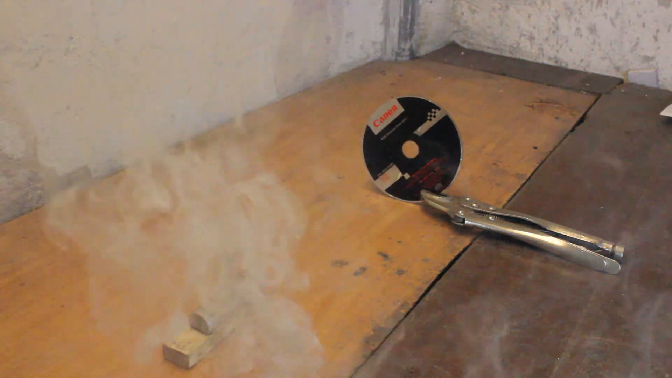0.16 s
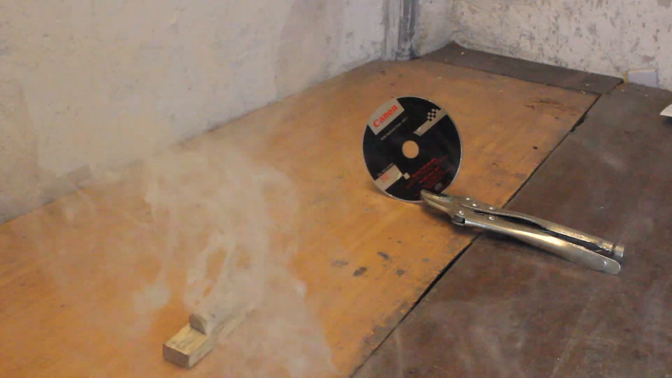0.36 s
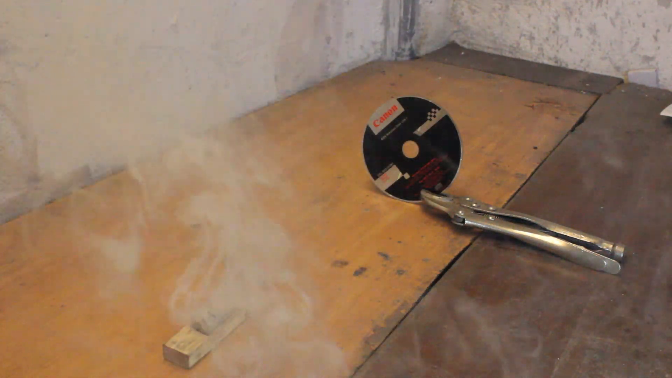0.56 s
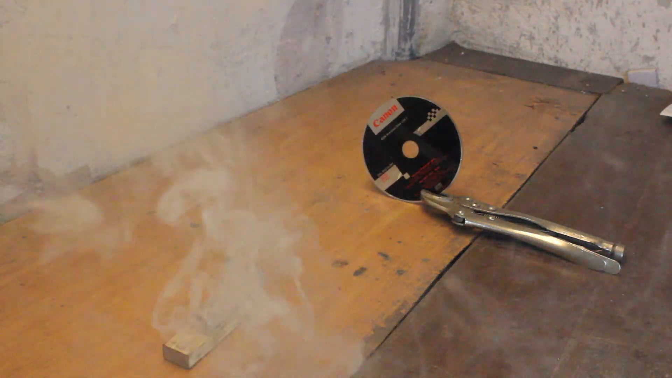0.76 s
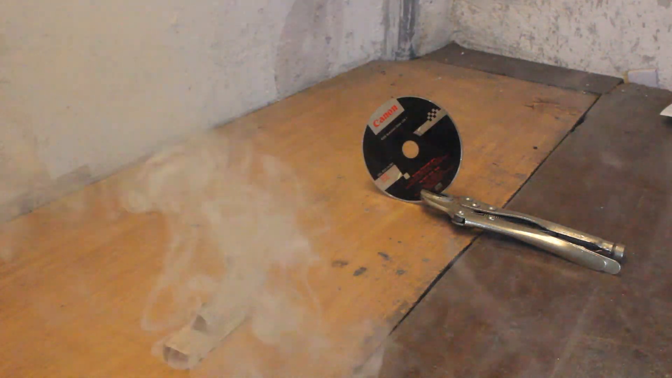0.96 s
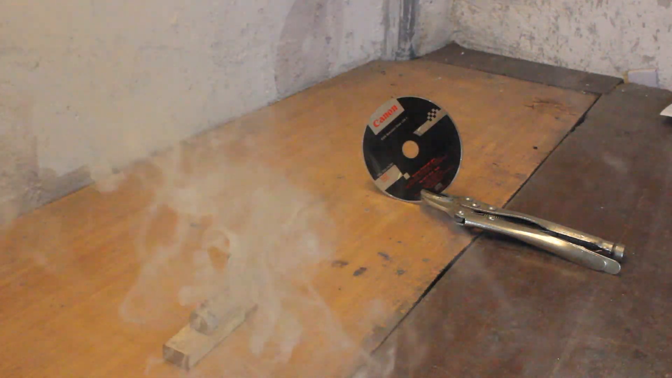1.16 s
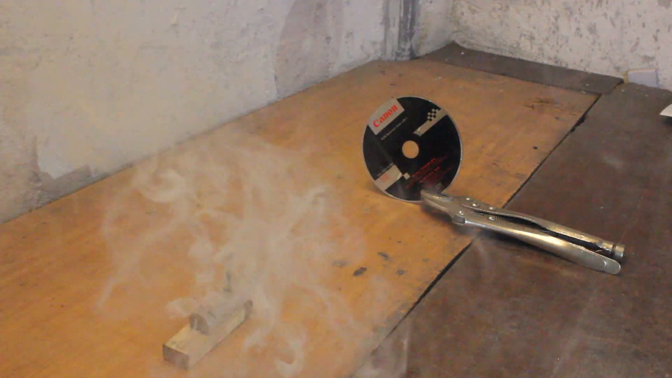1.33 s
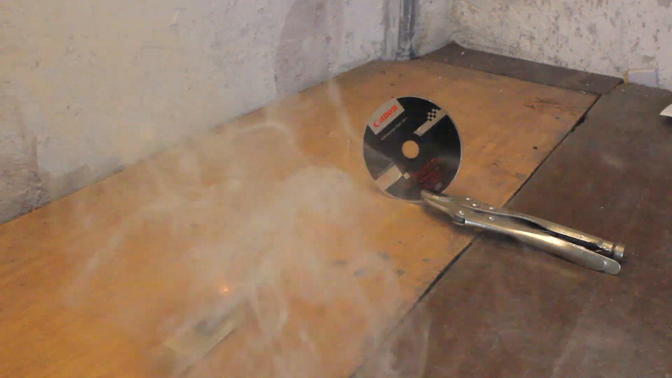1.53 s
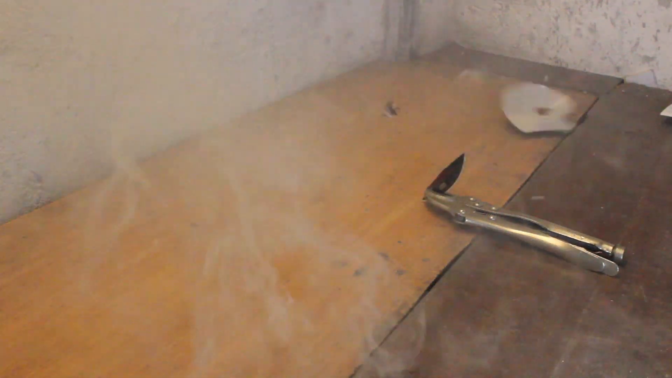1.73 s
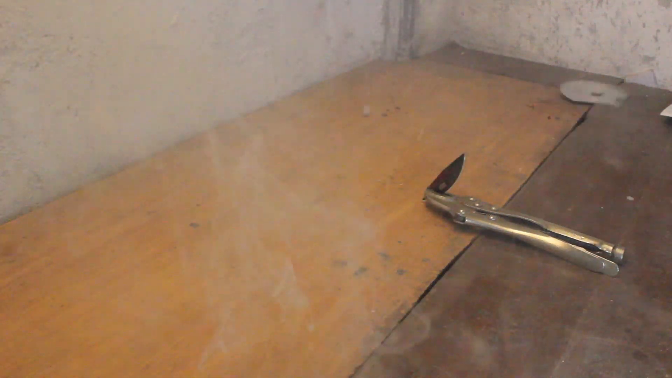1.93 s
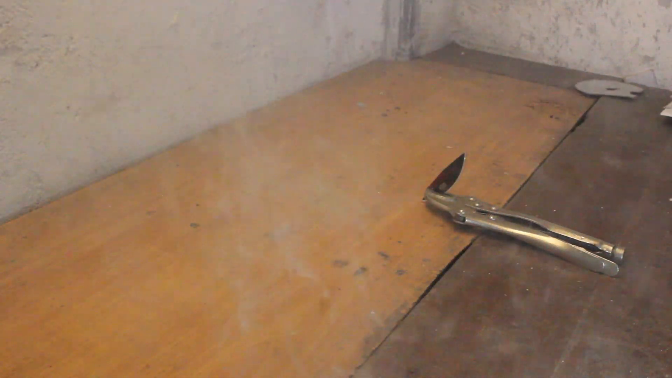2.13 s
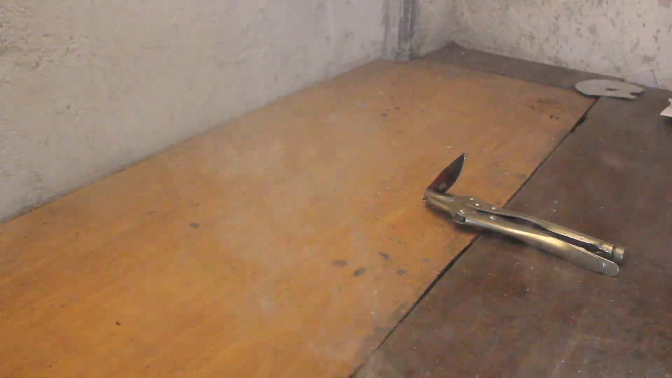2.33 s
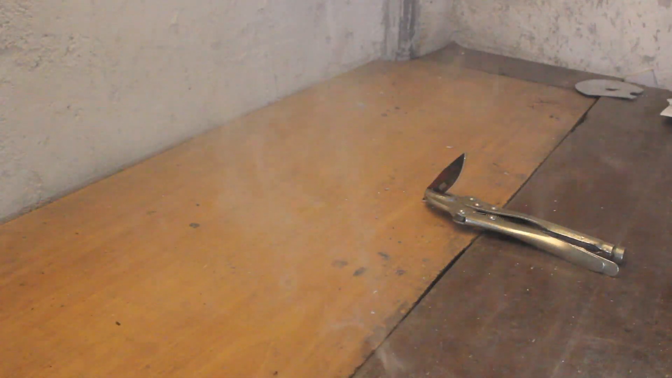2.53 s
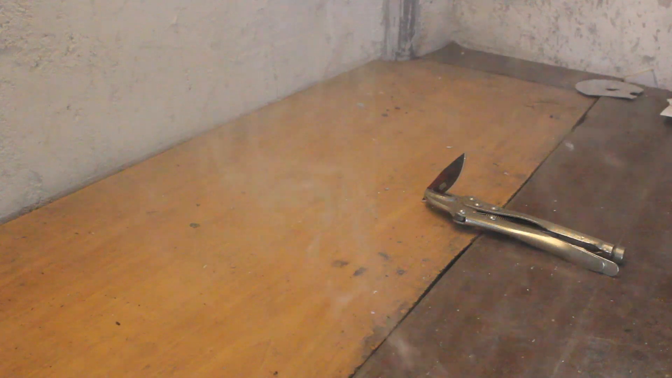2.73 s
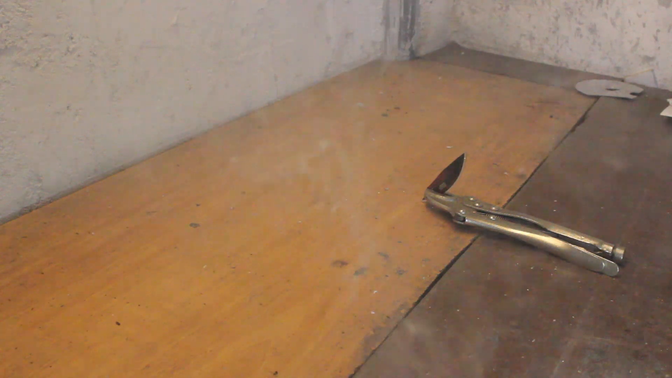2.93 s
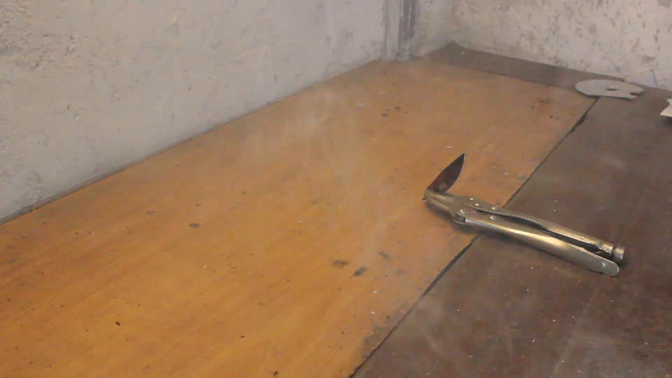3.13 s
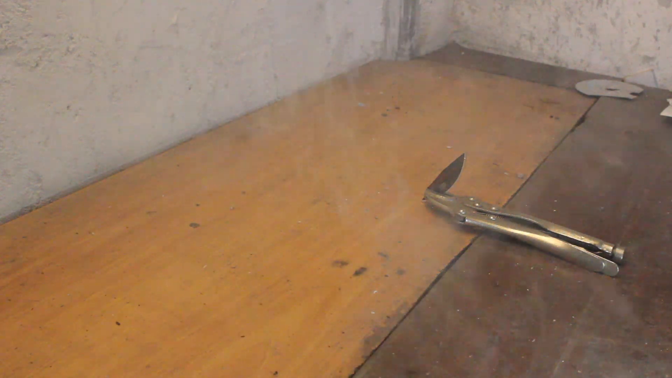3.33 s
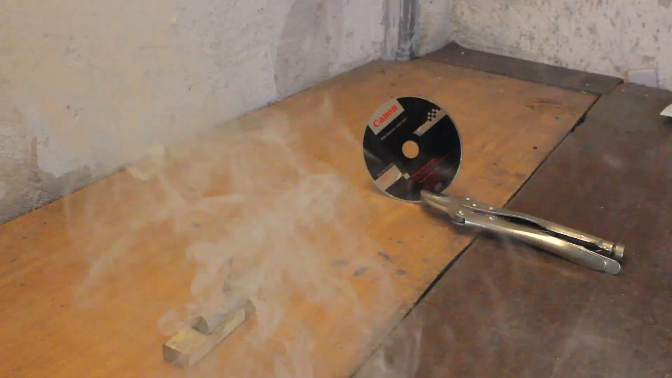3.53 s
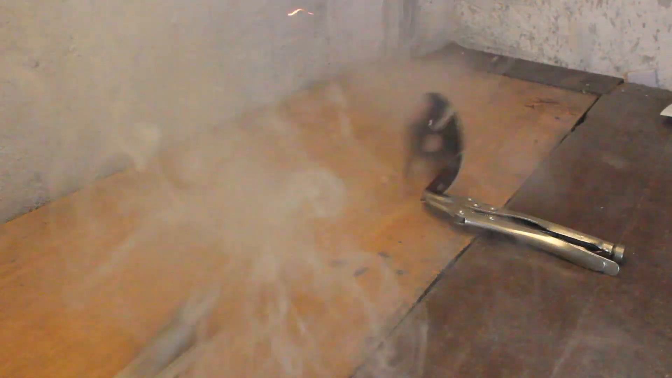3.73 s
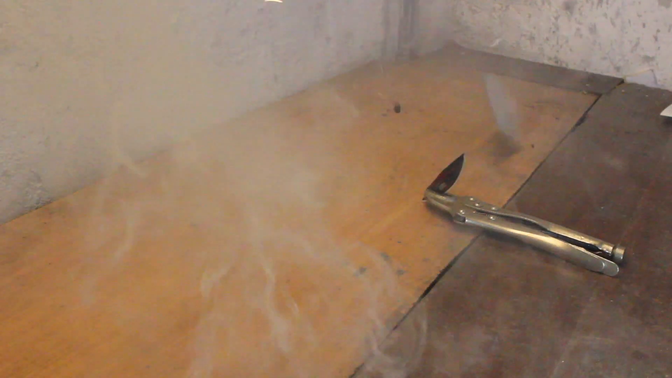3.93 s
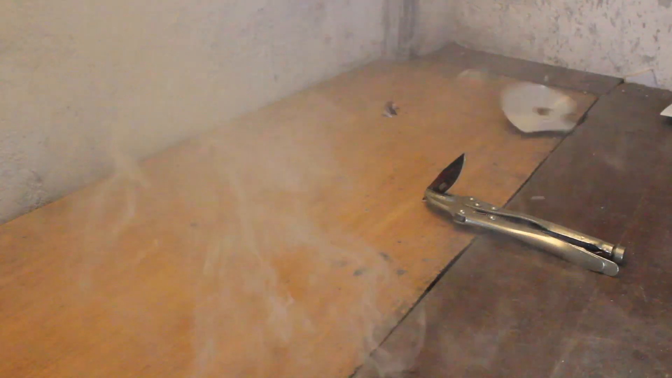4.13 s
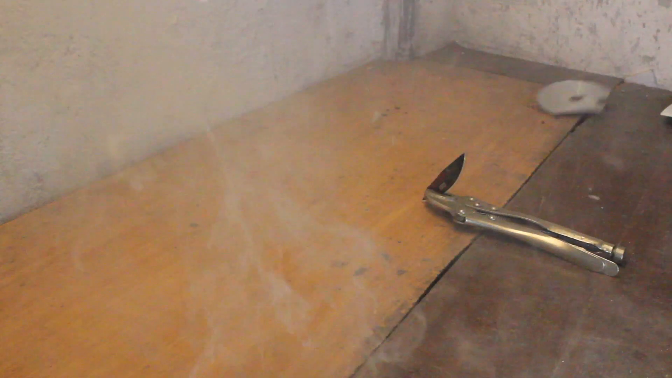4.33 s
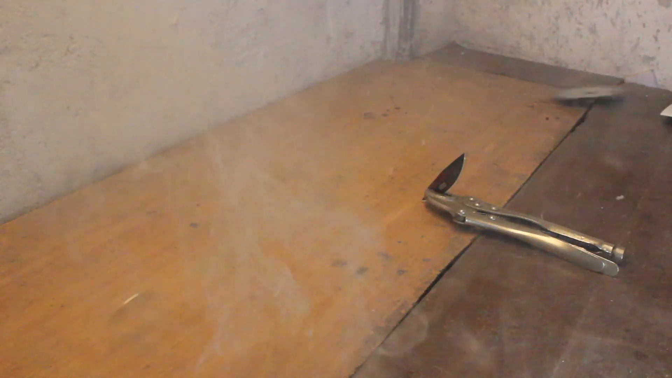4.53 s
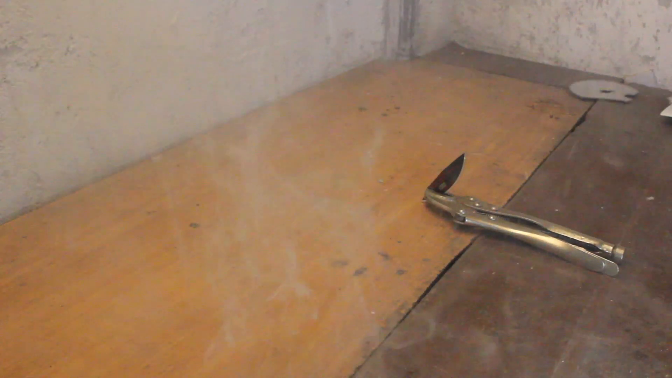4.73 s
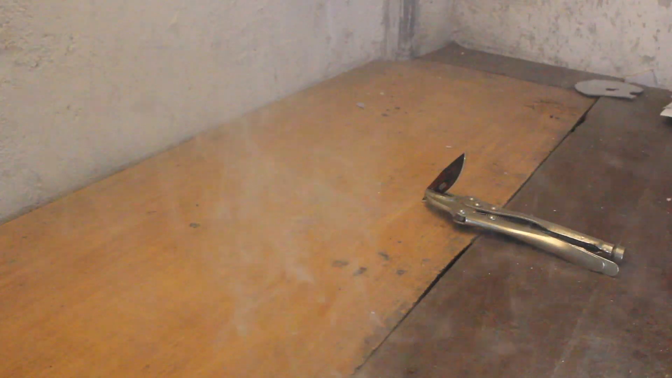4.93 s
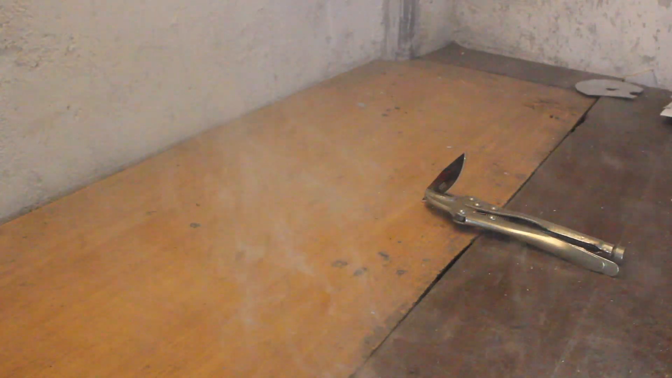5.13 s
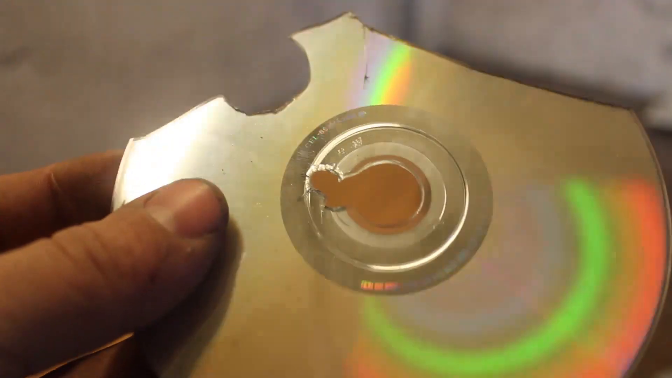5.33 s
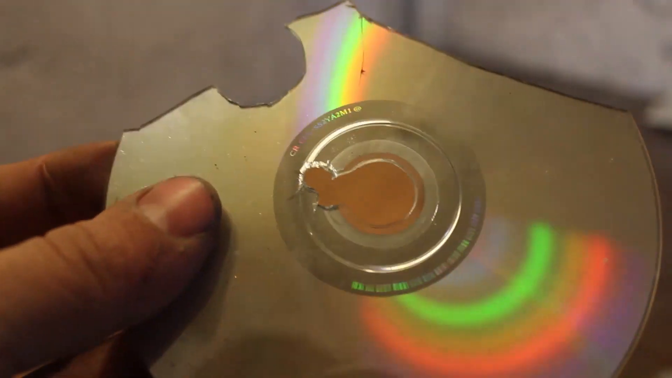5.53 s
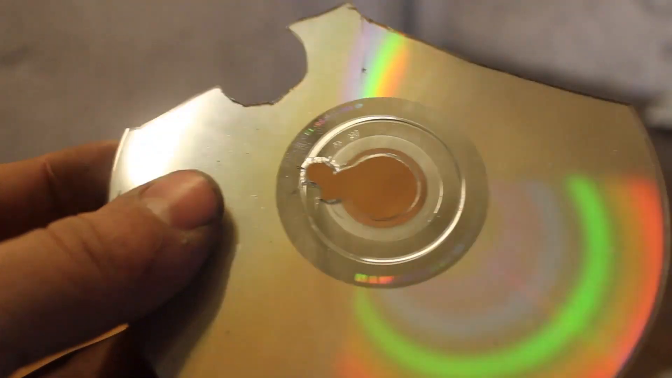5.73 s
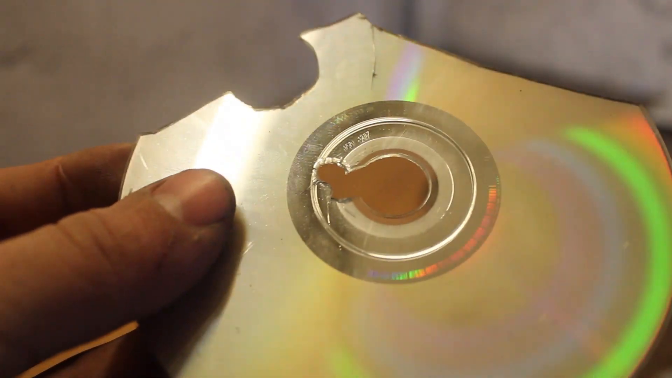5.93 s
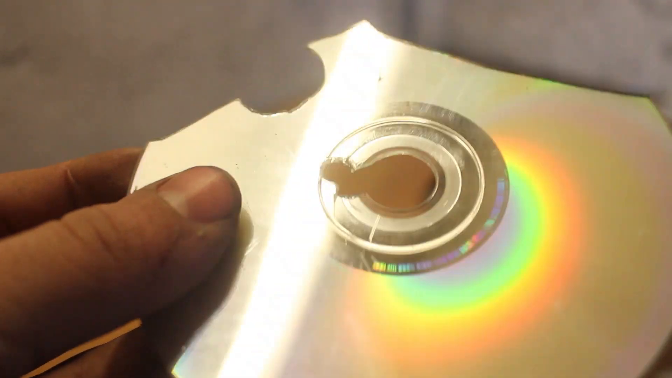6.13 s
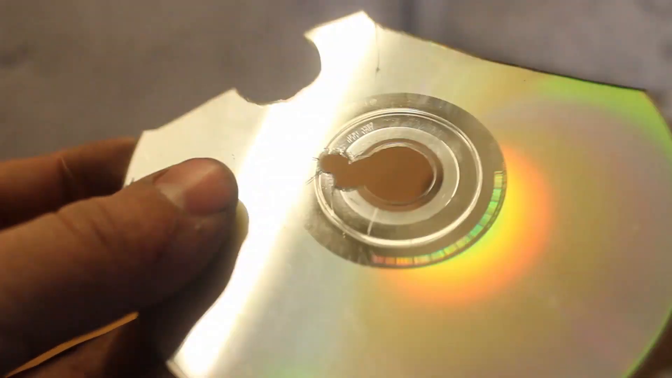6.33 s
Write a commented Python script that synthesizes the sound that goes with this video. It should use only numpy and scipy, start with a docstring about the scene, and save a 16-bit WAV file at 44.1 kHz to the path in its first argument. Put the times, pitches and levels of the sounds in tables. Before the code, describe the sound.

In a bare hard-walled workshop, a tiny metal cannon's fuse hisses thinly and whistles faintly. A sudden bang overloads the microphone, leaving a roaring room echo and metallic ring. Plastic shards, a disc piece and a steel ball tick and clatter across the bench, while the barrel softly smoulders. The shot then returns at less than half speed, deeper and stretched, before cutting to low quiet room hum.

```python
"""A workbench in a bare room: a tiny metal cannon is fired. The fuse hisses as coloured noise, the bang
(pressure wave, noise crack, room roar, ringing modes) overloads the camera; shards of a plastic disc and the
steel shot skitter about as short grains and dying modes; the barrel smoulders as filtered noise. The shot is
played again in slow motion, then a hand-held close-up holds the room's hum under the last ringing."""
import sys
import numpy as np
from scipy import signal
from scipy.io import wavfile
from scipy.ndimage import uniform_filter1d, minimum_filter1d

SR = 44100
rng = np.random.default_rng(int(sys.argv[2]) if len(sys.argv) > 2 else 0)


def gain_from_decibels(decibels):
    """Convert decibel values to linear amplitude factors."""
    exponent = np.asarray(decibels, float) / 20
    return 10 ** exponent


def to_wav(s):
    """Save 16-bit WAV."""
    ch = np.atleast_2d(s).T  # columns
    pcm = np.round(np.clip(ch, -1, 1) * 32767)  # PCM
    wavfile.write(sys.argv[1], SR, pcm.astype(np.int16))


N = 280917
CAMERA_SR = 48000  # Hz, rate of the scene; the output runs at SR
CLOSE_UP_S = 3.6

# low room and bench modes: (frequency [Hz], level 0.28 s after the shot [dB], t60 [s])
ROOM_MODES = [(61, -33.5, 3), (61.7, -33, 2.8), (140.4, -21, 1.9), (245.2, -19, 1.1), (396, -21, 1.1),
              (523.7, -21.5, 0.96), (813.5, -20.5, .9)]
# ring of the barrel: (frequency [Hz], level [dB], t60 [s])
BARREL_MODES = [(2900, -14, 1.05), (3350, -17, 1.)]
SHOT_S, BLAST_MS, BLAST_DB = 1.6366, 0.068, 10.5
CRACK_DB, CRACK_T60_S = 18, 0.14  # level before smoothing
ROAR_DB = 10.5  # mean magnitude over the first 2000 samples


def cannon():
    """A short pressure wave, the crack of the first reflections, the room's roar and modes left ringing."""
    out = np.zeros(N)
    u = np.arange(400) / CAMERA_SR / (BLAST_MS / 1000)
    add(out, SHOT_S, gain_from_decibels(BLAST_DB) * (1 - u) * np.exp(-u))
    t = np.arange(4800) / CAMERA_SR
    crack = uniform_filter1d(rng.standard_normal(4800), size=3)
    add(out, SHOT_S, gain_from_decibels(CRACK_DB - 60 * t / CRACK_T60_S) * crack)
    roar = room(colour_share=0.98)
    add(out, SHOT_S, gain_from_decibels(ROAR_DB) * roar / abs(roar[:2000]).mean())
    for hz, db, t60 in ROOM_MODES:
        add(out, SHOT_S, ring(hz, db + 60 * 0.28 / t60, t60))
    for hz, db, t60 in BARREL_MODES:
        add(out, SHOT_S, swelling(ring(hz, db, t60), depth=0.7))
    return out


# small shards landing, near or far: (time [s], level [dB], pitch [Hz], echo re blow [dB])
SHARD_LANDINGS = [(1.861, -28.5, 18000, -5.5), (2.001, -29.5, 13000, -11), (2.0087, -24, 10000, -10),
                  (2.0325, -15.5, 8200, 0), (2.053, -39.5, 14000, -12.5), (2.1173, -30.5, 19200, -12),
                  (2.134, -10, 7440, 3.5), (2.137, -19.5, 16000, 8), (2.2082, -19.5, 7240, -13),
                  (2.2261, -33, 9000, -4), (2.2337, -23, 8200, -8), (2.271, -21, 4800, -4),
                  (2.436, -16, 12000, -8)]
SHARD_RING_HZ, SHARD_RING_DB, SHARD_T60_S = 20400, -22, 0.016  # level re blow
# large piece of disc: (frequency [Hz], level [dB], t60 [s])
DISC_MODES = [(1790, -6, .03), (2560, 2, .16), (2900, -6, .06), (3250, -8, .06), (3900, -5, .03),
              (4600, -6, .03)]
# its falls: (time [s], blow level [dB], blow pitch [Hz], ring level [dB])
DISC_LANDINGS = [(2.3679, -4.5, 5800, -41), (2.387, -23, 4200, -36), (2.4592, -7, 3160, -25.5),
                 (2.571, -11.5, 4870, -39)]
# small stiff chip: (frequency [Hz], level [dB], t60 [s])
CHIP_MODES = [(8600, -4.5, .015), (11340, 2.5, 0.017), (14250, -7, 0.013)]
# its hops: (time [s], level [dB])
CHIP_LANDINGS = [(2.5245, -10), (2.6265, -13.5), (2.6479, -20.5), (2.6919, -13.5), (2.699, -19.5),
                 (2.72, -28), (2.74, -25.5)]
CHIP_BLOW_HZ, CHIP_RING_DB = 9500, -14.5  # ring re blow
# steel shot: (frequency [Hz], level [dB], t60 [s])
STEEL_MODES = [(5400, -7, .28), (10820, -17, .15), (15180, -2.5, .18), (15440, -4, 0.2), (21400, -6, 0.082)]
# its bounces, glancing ones favour the upper modes:
# (time [s], level [dB], tilt [dB per octave], time until damped [s])
STEEL_BOUNCES = [(1.9064, -47, 13, .12), (2.2486, -56, 6, 0.016), (2.255, -43, 8, 0.025),
                 (2.2789, -22.5, -2, .09), (2.407, -45.5, 14, 0.053)]
STEEL_BLOW_DB, STEEL_BLOW_HZ = 13, 11000  # level re bounce at zero tilt
DISC_ECHO_DB, CHIP_ECHO_DB, STEEL_ECHO_DB = 4.5, 0, 6  # re blow; steel at zero tilt
CRUMB_ECHO_DB, RING_ECHO_DB = -1.5, -18  # re crumbs, re rings


def debris():
    """Crumbs, shards, the large piece of disc, a hopping chip and the steel shot land, ring and echo."""
    blows, rings = crumbs(), np.zeros(N)
    send = gain_from_decibels(CRUMB_ECHO_DB) * blows
    hits = list(SHARD_LANDINGS)
    hits += [(s, db, hz, DISC_ECHO_DB) for s, db, hz, _ in DISC_LANDINGS]
    hits += [(s, db, CHIP_BLOW_HZ, CHIP_ECHO_DB) for s, db in CHIP_LANDINGS]
    for s, db, tilt_db, _ in STEEL_BOUNCES:  # glancing bounces click more than they ring
        hits.append((s, db + STEEL_BLOW_DB + tilt_db, STEEL_BLOW_HZ, STEEL_ECHO_DB - tilt_db))
    for s, db, hz, echo_db in hits:
        blow = landing(hz, db)
        add(blows, s, blow)
        add(send, s, gain_from_decibels(echo_db) * blow)

    for s, db, *_ in SHARD_LANDINGS:
        shard = ring(SHARD_RING_HZ, db + SHARD_RING_DB, SHARD_T60_S)
        add(rings, s, swelling(shard, depth=1.0))
    for s, *_, ring_db in DISC_LANDINGS:
        add(rings, s, struck(DISC_MODES, ring_db, depth=1.0))
    for s, db in CHIP_LANDINGS:
        add(rings, s, struck(CHIP_MODES, db + CHIP_RING_DB))
    for s, db, tilt_db, damped_s in STEEL_BOUNCES:
        rung = struck(STEEL_MODES, db, tilt_db)
        left_s = damped_s - np.arange(len(rung)) / CAMERA_SR
        add(rings, s, rung * np.clip(left_s / 0.004, 0, 1))

    send += gain_from_decibels(RING_ECHO_DB) * rings
    echo = signal.oaconvolve(send, room(colour_share=0.13))[:N]
    return blows + rings + echo


# plastic crumbs raining down: (time [s], rate [ticks per s])
CRUMB_RATE = [(1.7, 303), (1.9, 121.2), (2.1, 70), (2.8, 60)]
CRUMB_MIN_DB = -45


def crumbs():
    """Small random ticks of eight pitches, thinning out."""
    s, per_s = np.transpose(CRUMB_RATE)
    rate = np.interp(np.arange(N) / CAMERA_SR, s, per_s, left=0, right=0)
    falls = rng.random(N) < rate / CAMERA_SR
    sizes = gain_from_decibels(3.5 * np.minimum(rng.exponential(1, N), 3)) * falls
    kind = rng.integers(0, 8, N)
    out = np.zeros(N)
    for k, hz in enumerate(np.geomspace(8000, 21000, num=8)):
        out += signal.oaconvolve(sizes * (kind == k), tick(hz, CRUMB_MIN_DB, cycles=6.2))[:N]
    return out


def landing(hz, db, rattle_s=0.003, fall_db=-4.5):
    """A blow and three weaker contacts right after it; harder blows are shorter and broader."""
    out = np.zeros(800)
    cycles = np.interp(db, [-26, -14], [2.2, 0.8])
    add(out, 0, tick(hz, db, cycles))
    for late, pitch in rng.random((3, 2)):
        contact = tick(hz * (0.7 + 0.6 * pitch), db + fall_db * (1 + late), cycles)
        add(out, late * rattle_s, contact)
    return out


def struck(modes, db, tilt_db=0, depth=0.6):
    """All modes of one object ring from one blow; the tilt pivots on the third mode."""
    out = np.zeros(round(max(t60 for *_, t60 in modes) * CAMERA_SR) + 1)
    for hz, mode_db, t60 in modes:
        octaves = np.log2(hz / modes[2][0])
        add(out, 0, swelling(ring(hz, db + mode_db + tilt_db * octaves, t60), depth))
    return out


# colour of the powder jet: (frequency [Hz], relative level [dB])
JET_COLOUR = [(300, -13.5), (1500, 5.5), (2500, 9.5), (4200, -33.5), (7000, -24.5), (12000, -10),
              (17000, -10), (24000, -11)]
# it grows as the flame nears the charge: (time [s], level [dB])
JET_CURVE = [(0, -52.5), (1.636, -47.5)]
# touch hole resonances: (frequency [Hz], width [Hz], relative level before a gain of 3 [dB])
HOLE_PEAKS = [(3000, 440, 4.5), (5284, 390, -10.5)]
# whistle of the touch hole: (time [s], level [dB])
WHISTLE_CURVE = [(0.0, -46.5), (0.52, -45), (0.6, -49.5), (1.1, -50), (1.19, -42.5), (1.26, -49),
                 (1.34, -41.5), (1.57, -47.5), (1.6, -44.5), (1.63, -41)]
# the fuse spits: (time [s], level [dB], centre [Hz])
SPITS = [(0.8759, -28, 5500), (1.288, -38, 7000)]


def fuse():
    """Burning powder jets out, whistles in the touch hole and spits now and then: noise and grains."""
    jet = level(JET_CURVE) * noise(JET_COLOUR, patchy_db=0.8)
    flat = [(20, -40), (24000, -40)]
    out = jet + level(WHISTLE_CURVE) * noise(flat, HOLE_PEAKS, patchy_db=1.5)
    for s, db, hz in SPITS:
        add(out, s, tick(hz, db))
    return out


# colour of the smoulder: (frequency [Hz], relative level [dB])
SMOULDER_COLOUR = [(200, -51), (500, -3), (1300, -3), (2500, -7), (4000, -26.5), (7000, -37), (12000, -42),
                   (24000, -31.5)]
# bore resonances: (frequency [Hz], width [Hz], relative level before a gain of 3 [dB])
BORE_PEAKS = [(3230, 580, -9), (5800, 700, -32), (9050, 650, -35.5)]
# afterburn: (time [s], level [dB])
SMOULDER_CURVE = [(2.3, -45), (2.66, -32.5), (2.76, -33.5), (2.95, -32.5), (3.5, -35.5)]


def smoulder():
    """Residue burns on in the barrel: noise coloured by the bore's resonances."""
    return level(SMOULDER_CURVE) * noise(SMOULDER_COLOUR, BORE_PEAKS, patchy_db=0.6)


# hum before the close-up: (frequency [Hz], relative level per Hz [dB])
HUM_COLOUR = [(15, -51.5), (25, -15.5), (148, -5), (215, -26.5), (250, 6.5), (300, -5.5), (520, -4),
              (700, -8.5), (1300, -10), (2000, -19.5), (4150, -25), (24000, -47)]
# hum with the camera in the hand: (frequency [Hz], relative level per Hz [dB])
HAND_COLOUR = [(15, -40), (25, -7), (91, 2), (215, -9), (267, -5.5), (297, 4), (359, -7), (1200, -10.5),
               (4150, -29.5), (15500, -42.5)]
HUM_DB, HAND_DB = -39.5, -39  # rms


def workshop():
    """The hum of the place as coloured noise, deeper once the camera is in the hand."""
    hum = gain_from_decibels(HUM_DB) * noise(HUM_COLOUR, patchy_db=1.2)
    hand = gain_from_decibels(HAND_DB) * noise(HAND_COLOUR, patchy_db=1.2)
    return np.where(np.arange(N) > CLOSE_UP_S * CAMERA_SR, hand, hum)


# colour of the room's answer: (frequency [Hz], level at colour share 1 [dB])
ECHO_COLOUR = [(40, -36), (150, -17), (400, -1), (1200, 2.5), (2200, -3.5), (3500, -6), (6000, -14),
               (12000, -23), (24000, -21.5)]
# its decay: (frequency [Hz], t60 [s])
ECHO_T60 = [(60, 1.2), (260, 0.73), (700, .68), (1800, 0.66), (5000, 0.53), (10000, .33), (24000, 0.24)]
# low bands fill the room slowly: (frequency [Hz], time constant at colour share 1 [s])
ECHO_RISE = [(100, 0.018), (500, 0.08), (1500, 0.018), (5000, 0.00067)]


def room(colour_share):
    """The room's answer to a click: dense echoes, each band dying at its own speed, energy 1."""
    hz, t, z = signal.stft(rng.standard_normal(2 * CAMERA_SR), CAMERA_SR, nperseg=512)
    hz = hz[:, None]
    z *= gain_from_decibels(colour_share * read(ECHO_COLOUR, hz) - 60 * t / read(ECHO_T60, hz))
    z *= 1 - np.exp(-(t + 0.0035) / (colour_share ** 2 * read(ECHO_RISE, hz)))
    tail = signal.istft(z, CAMERA_SR, nperseg=512)[1]
    return tail / np.linalg.norm(tail)


def noise(colour, peaks=(), patchy_db=1.0, size=1024):
    """Noise of rms 1 and a given colour, with resonances added on top and drifting patches."""
    frames, hz = 4 * N // size + 5, np.fft.rfftfreq(size, 1 / CAMERA_SR)
    a, b, patches = rng.standard_normal((frames, len(hz), 3)).T
    patches = uniform_filter1d(patches, size=12, axis=0)
    patches = evened(uniform_filter1d(patches, size=10, axis=1))
    shape = gain_from_decibels(read(colour, hz))
    for centre_hz, width_hz, db in peaks:
        shape = shape + 3 * gain_from_decibels(db) / (1 + (2 * (hz - centre_hz) / width_hz) ** 2)
    z = (a + 1j * b) * shape[:, None] * gain_from_decibels(patchy_db * patches)
    return evened(signal.istft(z, nperseg=size, noverlap=3 * size // 4)[1][:N])


def ring(hz, db, t60):
    """One dying mode: a sine losing 60 dB in t60 seconds."""
    t = np.arange(round(t60 * CAMERA_SR)) / CAMERA_SR
    return gain_from_decibels(db - 60 * t / t60) * np.sin(2 * np.pi * hz * t)


def swelling(sound, depth):
    """Fast random swells, as when a spinning piece beams its ring unevenly."""
    swells = evened(uniform_filter1d(rng.standard_normal(len(sound)), size=120))
    return sound * (1 + depth * swells)


def tick(hz, db, cycles=2.0):
    """A soft-edged grain; more cycles make it longer and narrower in band."""
    u = np.arange(200) / CAMERA_SR * hz / cycles
    return gain_from_decibels(db) * np.sin(2 * np.pi * cycles * u) * 6 * u * np.exp(-2.5 * u)


def evened(x):
    """Scales to rms 1."""
    return x / np.sqrt(np.mean(x ** 2) + 1e-20)


def read(points, hz):
    """Reads a table on a log-frequency axis."""
    f, value = np.transpose(points)
    return np.interp(np.log(hz + 1), np.log(f + 1), value)


def level(rows):
    """Gain along a curve, silent outside it."""
    s, db = np.transpose(rows)
    return gain_from_decibels(np.interp(np.arange(N) / CAMERA_SR, s, db, left=-200, right=-200))


def add(mix, s, sound):
    """Mixes a sound in at s seconds."""
    part = mix[round(s * CAMERA_SR):][:len(sound)]
    part += sound[:len(part)]


def scene():
    """Everything in front of the camera."""
    return (cannon() + debris() + fuse() + smoulder() + workshop())[None]


def limiter(x, limit_db=-7, hold_s=0.8, recover_db_per_s=35, fall_s=0.0105):
    """Pulls peaks towards the limit, holds the gain low, then lets it climb back."""
    need_db = np.minimum(limit_db - 20 * np.log10(abs(x) + 1e-9), 0)
    hold = 2 * round(hold_s * CAMERA_SR / 2) + 1
    held_db = minimum_filter1d(need_db, size=hold, origin=hold // 2)
    climb_db = np.arange(N) * recover_db_per_s / CAMERA_SR
    held_db = np.minimum.accumulate(held_db - climb_db) + climb_db
    r = np.exp(-1 / (fall_s * CAMERA_SR))
    return x * gain_from_decibels(signal.lfilter([1 - r], [1, -r], held_db))


def band_limit(x):
    """A steep low-pass at the top of the band."""
    return signal.sosfilt(signal.butter(12, 16020, fs=SR, output="sos"), x)


CLIP_DB, BEND_DB = 7, 22.5  # hard rail, ceiling of the soft bend
AGAIN_FROM_S = 1.49853  # start of the replay, in scene time
CUT_S, CUT_BACK_S = 3.468, 5.232  # replay begins and ends, in output time


def record(dry):
    """The input stage saturates, the limiter follows; the edit repeats the shot slowly and peaks clip."""
    x = signal.sosfilt(signal.butter(3, 42, "highpass", fs=CAMERA_SR, output="sos"), dry[0])
    bent = x / np.sqrt(1 + (x / gain_from_decibels(BEND_DB)) ** 2)
    limited = limiter(np.clip(bent, -gain_from_decibels(CLIP_DB), gain_from_decibels(CLIP_DB)))

    live = signal.resample_poly(limited, 147, 160)  # CAMERA_SR to SR
    steep = signal.firwin(1021, 1 / 17, window=("kaiser", 9))
    again = limited[round(AGAIN_FROM_S * CAMERA_SR):][:CAMERA_SR]
    slowed = signal.resample_poly(again, 17, 8, window=steep)  # 0.432 of the speed

    cut, back = round(CUT_S * SR), round(CUT_BACK_S * SR)
    close_up = live[round((CLOSE_UP_S + 0.05) * SR):][:N - back]
    edit = np.concatenate([live[:cut], slowed[:back - cut], close_up])
    mix = np.clip(edit, -1, 1)[None]
    return band_limit(mix)


dry = scene()
out = record(dry)
to_wav(out)
```